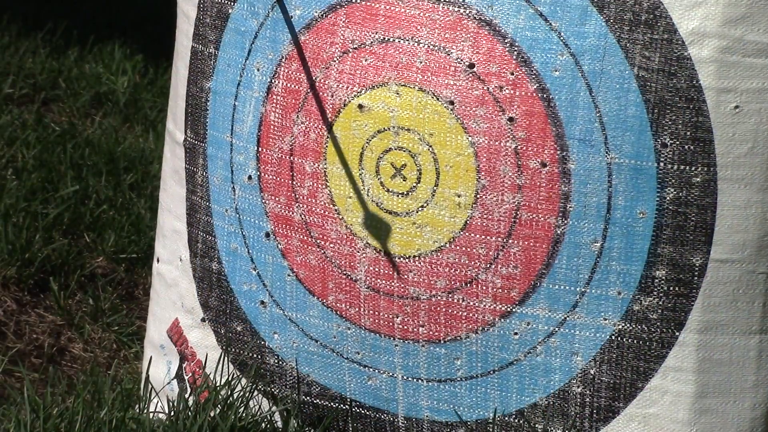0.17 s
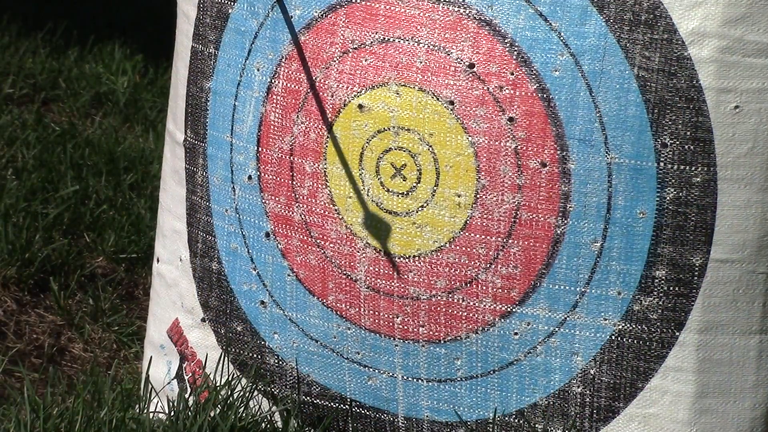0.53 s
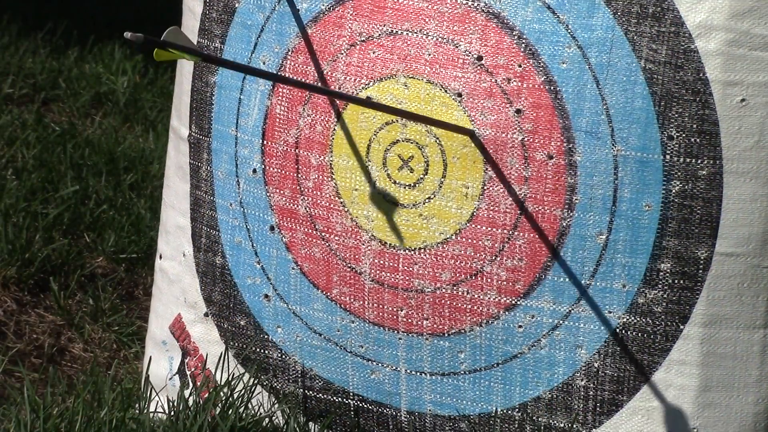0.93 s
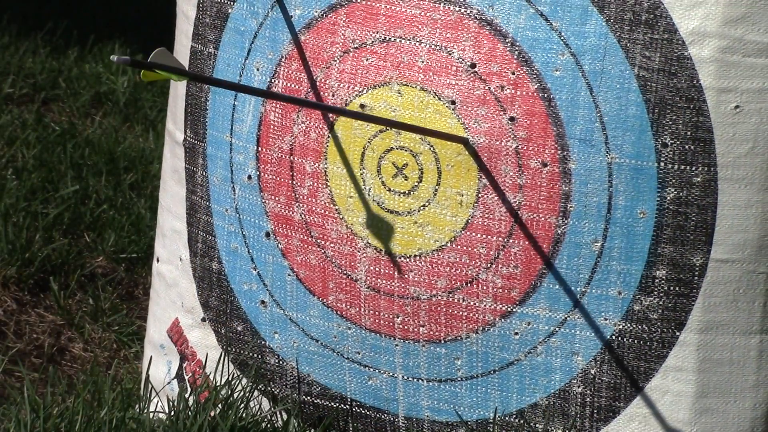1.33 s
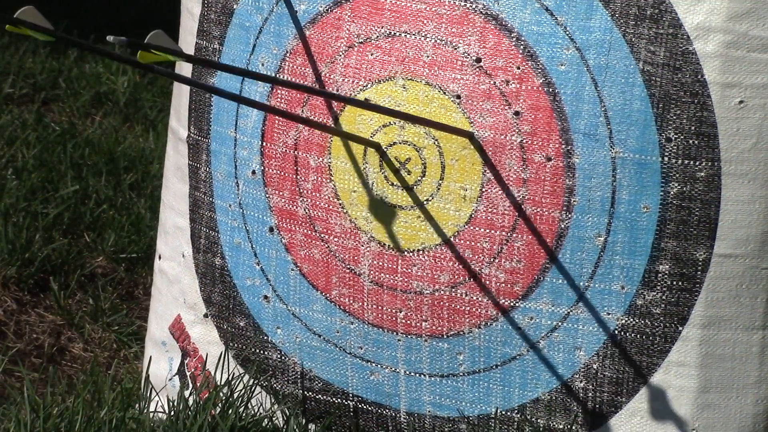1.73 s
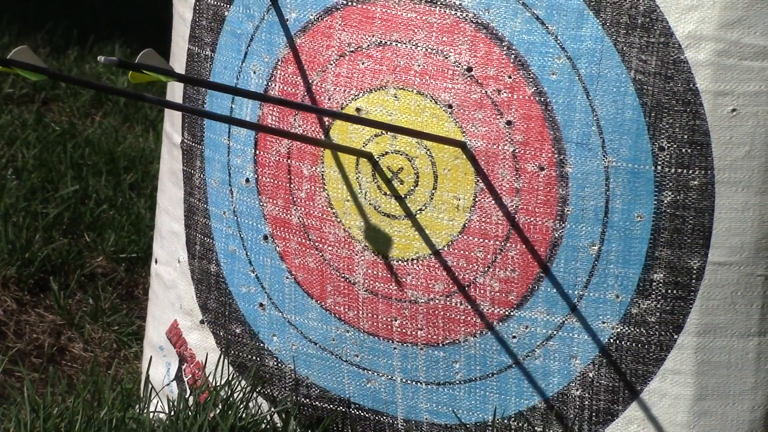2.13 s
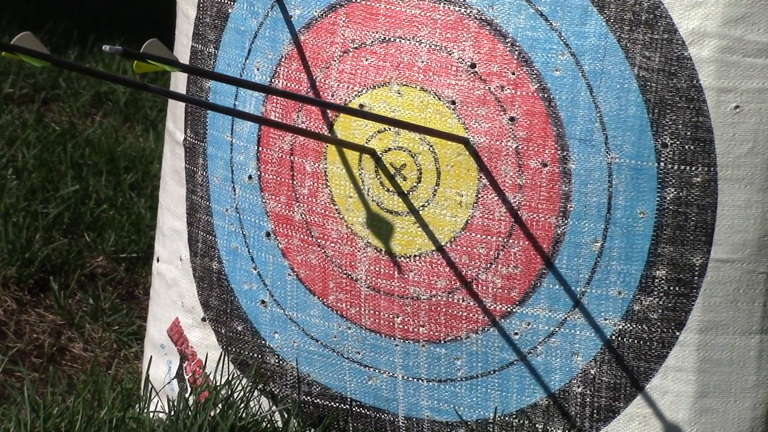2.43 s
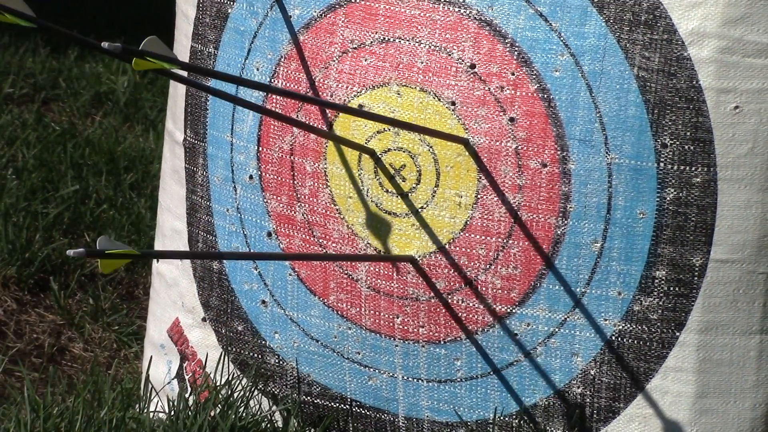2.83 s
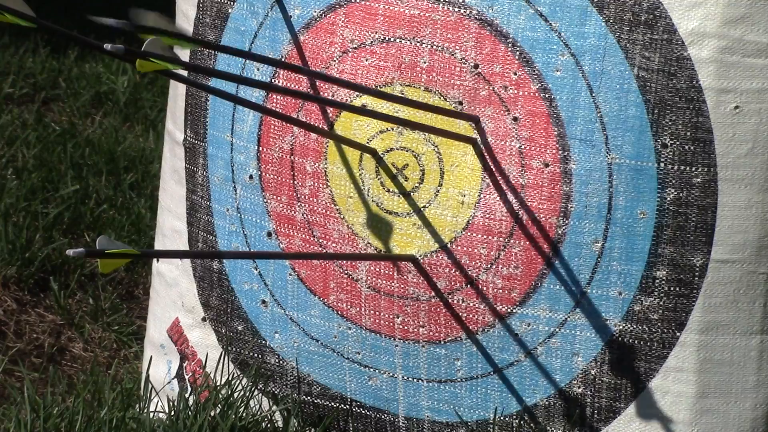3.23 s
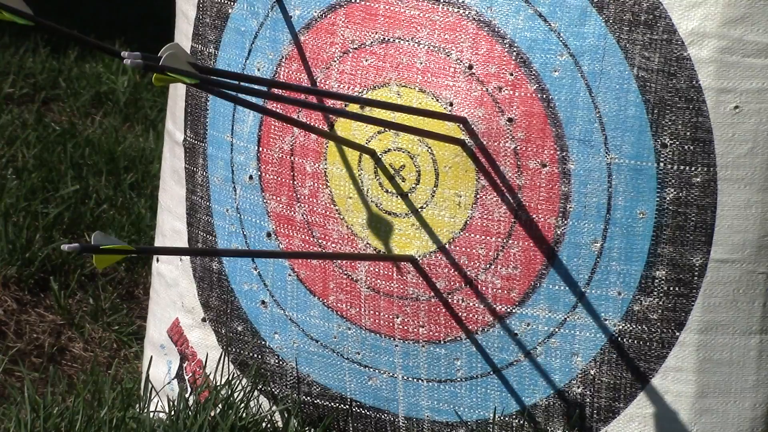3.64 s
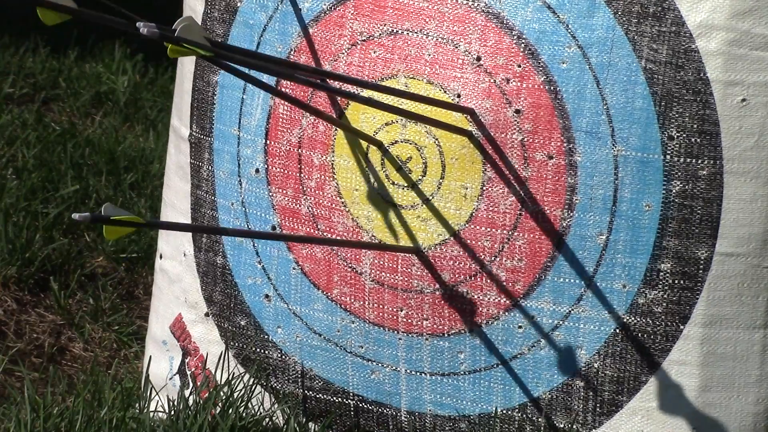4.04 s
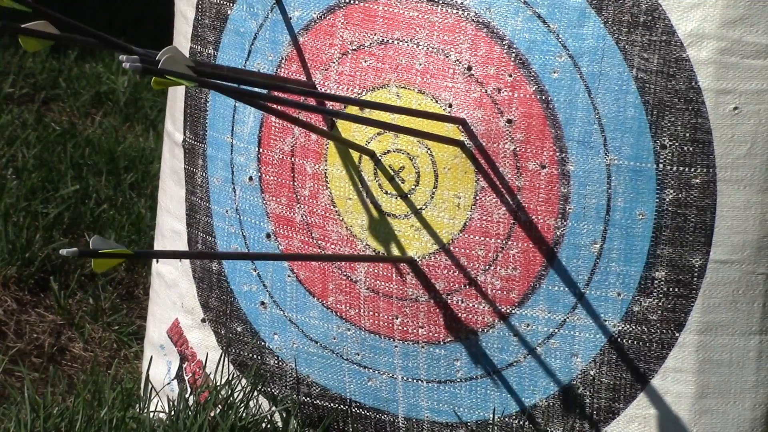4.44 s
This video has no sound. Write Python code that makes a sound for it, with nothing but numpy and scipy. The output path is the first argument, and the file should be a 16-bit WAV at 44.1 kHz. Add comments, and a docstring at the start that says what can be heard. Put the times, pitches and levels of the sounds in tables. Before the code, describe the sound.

Five similar archery shots, recorded close to the target: faint bow snap slightly left, about a fifth of a second of vane hiss rushing nearer, then a sharp overloaded smack of taut fabric with a falling thud and hollow bag boom. Lodged shafts wobble with small dull knocks and dry rasps; brief tree reflections fade or stop short. Between hits, low outdoor air, a thin insect trill and a far whine that dies away.

```python
"""Five arrows strike a fabric bag target on a lawn, heard from beside it: each hit is a ringing pop and tear
of taut fabric over a falling thud and a boom, loud enough to overload the microphone. The shaft then knocks
and rasps in the bag while noise tails give the scatter of the trees. Before each hit a compound bow snaps
twice, built from noise bursts and ringing modes, and the vanes hiss and whistle as the arrow nears.
Behind lie outdoor air, a faint insect trill in filtered noise and a wavering far whine."""
import sys
import numpy as np
from scipy import signal
from scipy.fft import rfft, irfft
from scipy.io import wavfile

SR = 44100
rng = np.random.default_rng(int(sys.argv[2]) if len(sys.argv) > 2 else 0)


def master_out(mix):
    """Clip the mix to full scale and print it as 16-bit PCM to the path in sys.argv[1]."""
    frames = np.transpose(np.atleast_2d(mix))
    ceiling = np.clip(frames, -1, 1)
    pcm = np.round(ceiling * 32767).astype(np.int16)
    wavfile.write(sys.argv[1], SR, pcm)


N = 202128
TIME = np.arange(N) / SR

# All spectra list pitch_hz, density_db (relative); noise() brings each to rms 1.
# All sets of modes list pitch_hz, level_db (relative), t60_s.

# Arrows striking the bag: start_s, thud_db, thud_hz (where it settles), dent_hz (extra pitch at first), boom_db
HITS = [(0.885, -4.5, 195, 560, -13.5), (1.7052, -1.5, 162, 435, -5), (2.571, -1.5, 189, 372, -5),
        (3.2753, -4.5, 149, 465, -5), (3.869, 0.5, 182, 342, -12.5)]
# Fabric bursting, hit by hit: pop_hz, treble_db (tilt per decade), tear_db, top_hz (of the tear), hollow (0-1)
CRACKS = [(1942, 8.5, -8, 6300, 0.71), (2290, -15, -8, 10300, .8), (2150, -11.5, -4, 7100, 0),
          (1710, -5, -2, 5140, 0.5), (1820, 4.5, -3.5, 12000, 1)]
# Modes: overtones of the taut fabric
FABRIC = [(5190, -8, 0.0028), (7320, -5.5, 0.0018), (10230, -16, 0.00061), (12400, -15.5, 0.0015),
          (14340, -26, .0016)]
# Band where taut fabric radiates weakly, between pop and overtones: low_hz, high_hz
HOLLOW_HZ = [3010, 4500]
# Modes: the bag as a whole and its stretched face
BAG = [(155, 4, 0.036), (515, -6.5, 0.039), (615, -3, 0.022)]
# Lodged shafts whipping back: delay_s (after the hit), thump_hz, thump_db, rasp_db, return_db (second thump)
WHIPS = [(0.0316, 377, -12, -25.5, -31), (0.028, 276, -11, -34, -12.5), (0.028, 250, -22, -40, -15.5),
         (0.018, 230, -14.5, -54.5, -21), (0.032, 374, -19, -42, -18)]
# Spectrum: the shaken filling
FILLING = [(30, -28), (60, -1), (110, -1.5), (300, -4), (560, -7), (850, -24.5), (1500, -32), (4000, -29)]
# Spectrum: the shaft rasping in its hole
RATTLE = [(300, -23), (700, 1), (1800, 10), (3200, -3), (5000, 3), (7000, -2), (9000, -5), (12500, -21.5),
          (16000, -71)]
# Bow loosed: start_s, click_db
RELEASES = [(0.675, -53), (1.495, -44), (2.349, -20.5), (3.064, -39), (3.658, -43)]
# Modes: limbs, cams and cables of the bow
BOW = [(287, -5.5, 0.1), (437.8, -10, 0.33), (547, -8, 0.22), (884, -18.5, 0.13), (1095, -6, 0.059),
       (1486, -2.5, 0.083), (1950, -7.5, 0.092), (2160, -12, 0.067), (2800, -12, 0.059), (3310, 3, 0.023)]
# Spectrum: clatter of the bow
SNAP = [(60, -16), (150, 2.5), (450, 2.5), (900, -5.5), (1700, -2), (3300, -4), (4000, -7), (5200, -11.5),
        (7000, -20), (11000, -25.5), (16000, -51)]
# Arrows in flight: hiss_db, rush_db (steady part), whistle_db, whistle_s (how long before the hit it sets in)
FLIGHTS = [(-35.5, -56, -59, 0.12), (-37, -56, -62, 0.22), (-40.5, -49.5, -49.5, 0.202),
           (-36.5, -56.5, -53.5, 0.1), (-39.5, -54, -68, 0.078)]
# Whistle of the vanes: pitch_hz, level_db (relative), swell (power of the nearness)
VANES = [(349, 10.5, 0.93), (670, 2.5, 0.77), (1160, 3.5, 0.19)]
# Spectrum: hiss of the vanes
HISS = [(100, -2.5), (250, -15), (600, -14.5), (1100, 0.5), (1700, 0.5), (2500, 4), (4300, 2), (6000, -5.5),
        (10500, -13), (13000, -20), (16000, -24)]
# Scatter after each hit: level_db (added to both tree layers), rumble_db (on the low part), sheen_db, length_s
TAILS = [(0.5, -6.5, -47, 0.37), (-2, 2, -48, 0.51), (-2, 0.5, -45, 0.217), (3, -6.5, -60, .32),
         (1.5, 2.5, -34, .68)]
# Spectra: low, high and glittering parts of the scatter
TREES_LOW = [(70, -10.5), (250, 7.5), (500, -7), (900, -2.5), (1800, -1), (2500, -6.5), (3400, -13.5),
             (5000, -61)]
TREES_HIGH = [(2500, -42.5), (3600, -1), (5000, 5.5), (6800, -4), (8500, -12), (12000, -25.5), (16000, -41)]
SHEEN = [(4500, -17), (5600, 9), (7000, 5), (8500, -12), (12000, -10), (14500, -23)]
# Spectrum: outdoor air
AIR = [(15, -58), (25, -56), (45, -15.5), (170, -2), (195, -4.5), (229, -3.5), (439, -9), (503, -10.5),
       (560, -13), (1070, -18.5), (1160, -19.5), (2910, -23), (6920, -31.5), (8360, -36), (16000, -42.5)]
# Spectrum: insects
INSECTS = [(6800, -39.5), (7600, -15.5), (8000, -12.5), (8400, -6.5), (8650, -11), (9000, -44.5),
           (10000, -52)]
# Stereo width of the noise layers: pitch_hz, side_db (against the mid)
WIDTH = [(100, -16.5), (700, -7.5), (2400, -24), (4400, -18.5), (8000, -11.5), (15000, -19)]

POP_DB, POP_T60_S, TEAR_T60_S, CRACK_CUT_HZ = 10, 0.0025, 0.0072, 1257
THUD_T60_S, THUD_DOUBLES_DB = 0.053, 7.5   # ring of a 0 dB thud; it doubles for this many dB more
FILLING_DB, RATTLE_DB = -23, -43
FILLING_FOLLOWS = 0.4   # share of the boom's level that the deep shake of the filling follows
RETURN_S, RETURN_PITCH = 0.053, 0.83   # the slower return swing thumps lower
SLIP_START_S, SLIP_EVERY_S, SLIP_DB, SLIP_LOSS_DB = 0.044, 0.0066, -32.5, 3.5   # loss is per slip
SNAP_DB, REBOUND_DB, REBOUND_S = -31, -31, 0.0255
TREES_LOW_DB, TREES_HIGH_DB, RUMBLE_EDGE_HZ, SHEEN_T60_S = -36, -36.5, 450, 0.64
EDGE_ECHO_S, WALL_ECHO_S = 0.0226, 0.174
AIR_DB, INSECTS_DB = -52.5, -63.5
WHINE_HZ, WHINE_DB, WHINE_T60_S = 496, -49.5, 2
PORT_LAG_S, MIC_CUT_HZ, CUTOFF_HZ = 3e-6, 53, 16000


def impacts(dent_s=0.0032):
    """Under each crack a thud falls in pitch as the dent spreads, and the whole bag booms."""
    body = 0
    for s, thud_db, thud_hz, dent_hz, boom_db in HITS:
        age = np.maximum(TIME - s, 0)
        cycles = thud_hz * age + dent_hz * dent_s * (1 - np.exp(-age / dent_s))
        thud_t60 = THUD_T60_S * 2 ** (thud_db / THUD_DOUBLES_DB)
        body = body + from_db(thud_db) * np.cos(2 * np.pi * cycles) * decay(s, thud_t60)
        for hz, db, t60 in BAG:
            boom = np.cos(2 * np.pi * hz * age) * decay(s, t60, rise=0.0018)
            body = body + from_db(boom_db + db) * boom
    # the small puncture radiates no bass, the soft filling no treble
    crack = band(band(cracks(), CRACK_CUT_HZ, "high"), CRACK_CUT_HZ, "high")
    return crack + band(body, [85, 750], "band")


def cracks():
    """The point pops the taut fabric, rings its overtones and tears its weave."""
    out, white = 0, rng.standard_normal(N)
    for (s, *_), (pop_hz, treble_db, tear_db, top_hz, hollow) in zip(HITS, CRACKS):
        pop = ring(s, pop_hz, POP_T60_S)
        for hz, db, t60 in FABRIC:
            tilt_db = treble_db * np.log10(hz / pop_hz)
            pop = pop + from_db(db + tilt_db) * ring(s, hz, t60)
        weave = rms_one(band(white, [1300, top_hz], "band"))
        tear = weave * (decay(s, TEAR_T60_S) + 0.047 * decay(s, t60=0.039))
        crack = from_db(POP_DB) * pop + from_db(tear_db) * tear
        out = out + crack - np.clip(hollow, 0, 1) * band(crack, HOLLOW_HZ, "band")
    return out


def quiver():
    """The lodged shaft whips out and back: it knocks twice, shakes the filling and rasps in its hole."""
    out, filling = 0, noise(FILLING).mean(axis=0)
    deep = band(filling, 170, "low")
    dull = -band(filling, 160, "high")   # inverted to join the deep band smoothly
    rasp = rms_one(compact(noise(RATTLE)) * from_db(1.5 * flutter(660)))
    slap = band(rasp, 12000, "low")
    for (s, *_, boom_db), (whip_s, hz, thump_db, rasp_db, return_db) in zip(HITS, WHIPS):
        swing = np.exp(-((TIME - s - 0.05) / 0.021) ** 2)   # the shaft swings back
        shaken = dull + from_db(3.5 + FILLING_FOLLOWS * boom_db) * deep
        shake = shaken * (decay(s, t60=0.28, rise=0.0013) + 0.17 * swing)
        rattle = rasp * (swing + 0.22 * decay(s, t60=0.13, rise=0.0039))
        out = out + from_db(FILLING_DB) * shake + from_db(RATTLE_DB) * rattle
        out = out + from_db(thump_db) * thump(s + whip_s, hz)
        out = out + from_db(return_db) * thump(s + RETURN_S, hz * RETURN_PITCH)
        scrape = from_db(rasp_db) * decay(s + whip_s, t60=0.019)
        out = out + slap * (scrape + slips(s + SLIP_START_S))
    return band(out, 85, "high")


def thump(start, hz):
    """A soft knock of the shaft against the filling; height 1."""
    wave = np.sin(2 * np.pi * hz * (TIME - start)) * decay(start, t60=0.011, rise=0.0073)
    return wave / np.abs(wave).max()


def slips(start, count=3):
    """Level of a short, uneven, dying run of slips of the shaft in its hole."""
    level, jitter = 0, rng.uniform(-0.118, 0.126, count)   # jitter in shares of the interval
    for k in range(count):
        moment = start + SLIP_EVERY_S * (k + jitter[k])
        level = level + from_db(SLIP_DB - SLIP_LOSS_DB * k) * decay(moment, t60=0.028)
    return level


def bow():
    """The string slams home and rings the bow; a thinner, higher snap follows on the rebound."""
    out, clatter = 0, compact(noise(SNAP), treble_db=8)
    thin = rms_one(band(clatter, [2000, 4000], "band"))
    click = rms_one(band(clatter, 770, "high") + 1.3 * band(clatter, 6000, "high"))
    for s, click_db in RELEASES:
        again, modes = s + REBOUND_S, 0
        for hz, db, t60 in BOW:
            struck = ring(s, hz, t60) + 0.17 * ring(again, hz, t60)
            modes = modes + from_db(db) * rng.choice([-1, 1]) * struck
        slam = clatter * (0.53 * decay(s, t60=0.011) + 0.68 * decay(s, t60=0.18, rise=0.0015))
        slam = slam + 0.79 * band(modes, 260, "high")
        rebound = 1.2 * thin * decay(again, t60=0.017)
        rebound = rebound + 0.56 * clatter * decay(again, t60=0.078, rise=0.0012)
        clicks = click * (decay(s, t60=0.0072) + decay(again, t60=0.015))
        out = out + from_db(SNAP_DB) * slam + from_db(REBOUND_DB) * rebound + from_db(click_db) * clicks
    return out


def flight(miss_s=0.026, nearest_s=0.0267, mach=0.19, bend_s=0.0352):
    """Vanes hiss and whistle louder as the arrow nears; their whistle sinks as it comes abreast."""
    out, hiss = 0, noise(HISS) * from_db(2 * flutter(250))
    bright = band(hiss, 7400, "high")
    for (loosed, _), (s, *_), (hiss_db, rush_db, whistle_db, whistle_s) in zip(RELEASES, HITS, FLIGHTS):
        airborne = np.clip((TIME - loosed) / 0.019, 0, 1) * np.clip((s - TIME) / 0.0015, 0, 1)
        ahead = s - nearest_s - TIME   # seconds still to fly to the nearest point
        nearness = miss_s / np.hypot(ahead, miss_s)
        abreast = np.exp(-np.abs(s - 0.012 - TIME) / 0.014)   # the top is heard best from the side
        rush = hiss * (from_db(hiss_db) * nearness ** 2.65 + from_db(rush_db))
        rush = rush + from_db(hiss_db + 8.5) * abreast * bright
        doppler = (1 - mach) / (1 - mach * ahead / np.hypot(ahead, bend_s))
        eddies = 1 + 0.0062 * flutter(120)   # they unsteady the pitch
        turns = 2 * np.pi * np.cumsum(doppler * eddies) / SR
        # the whistle is thrown forward, the more so the higher its pitch
        beam = np.clip((s - TIME) / 0.047, 0, 1)
        whistle = 0
        for hz, db, swell in VANES:
            tone = np.sin(hz * turns + rng.uniform(0, 2 * np.pi))
            whistle = whistle + from_db(db) * nearness ** swell * beam ** (hz / 600) * tone
        sets_in = np.clip((TIME - s + whistle_s) / 0.0083, 0, 1)
        out = out + airborne * rush + sets_in * from_db(whistle_db + 1.8 * flutter(60)) * whistle
    return out


def garden(hit):
    """Lawn and trees scatter each crack as noise tails; a near edge ticks and a far wall echoes dully."""
    low, high, sheen, out = noise(TREES_LOW), noise(TREES_HIGH), noise(SHEEN), 0
    rumble = band(low, RUMBLE_EDGE_HZ, "low")
    middle = -band(low, RUMBLE_EDGE_HZ, "high")   # inverted to join the rumble smoothly
    for (s, *_), (db, rumble_db, sheen_db, length_s) in zip(HITS, TAILS):
        body = (middle + from_db(rumble_db) * rumble) * decay(s, t60=0.96, rise=0.11)
        treble = high * decay(s, t60=0.66, rise=0.13)
        glitter = from_db(sheen_db) * sheen * decay(s, SHEEN_T60_S, rise=0.082)
        tail = from_db(TREES_LOW_DB + db) * body + from_db(TREES_HIGH_DB + db) * treble + glitter
        out = out + tail * np.clip((s + length_s - TIME) / 0.013, 0, 1)   # the tail stops short
    tick = from_db(-19.5) * delayed(band(hit, [3800, 6200], "band"), EDGE_ECHO_S)
    wall = from_db(-28) * delayed(band(hit, [700, 1200], "band"), WALL_ECHO_S)
    return out + tick + wall


def background():
    """Air and insect trill, both noise of gently wavering level, and a far whine that swells and fades."""
    air = band(from_db(AIR_DB) * noise(AIR), 14000, "low") * from_db(1.37 * flutter(8))
    insects = from_db(INSECTS_DB) * noise(INSECTS) * from_db(flutter(40))
    turns = 2 * np.pi * np.cumsum(WHINE_HZ * (1 + 0.003 * flutter(8))) / SR
    whine_level = from_db(WHINE_DB + 2 * flutter(15)) * decay(0, WHINE_T60_S, rise=0.085)
    return air + insects + whine_level * np.sin(turns)


def from_db(db):
    """Decibels to amplitude."""
    return 10 ** (np.asarray(db) / 20)


def rms_one(x):
    """Scale to rms 1."""
    return x / np.sqrt(np.mean(x ** 2) + 1e-20)


def band(x, edges_hz, kind):
    """Gentle second-order Butterworth filter."""
    sos = signal.butter(2, np.clip(edges_hz, 10, 0.45 * SR), kind, fs=SR, output="sos")
    return signal.sosfilt(sos, x + 1e-18)


def noise(spectrum):
    """Steady stereo noise of a given colour; rms 1."""
    hz, db = np.transpose(spectrum)
    bins = np.maximum(np.fft.rfftfreq(N, 1 / SR), 1)
    gain = from_db(np.interp(np.log(bins), np.log(hz), db))
    gain = gain * np.minimum(bins / hz[0], 1) * np.minimum(hz[-1] / bins, 1)   # slopes beyond the ends
    mid, side = rfft(rng.standard_normal((2, N))) * gain
    side = side * from_db(np.interp(bins, *np.transpose(WIDTH)))
    return rms_one(irfft(np.array([mid + side, mid - side]), N))


def compact(x, treble_db=0.0, edge_hz=3600):
    """Narrow noise to mono below the edge, leaving stereo width only in the treble."""
    mid, side = x.mean(axis=0), (x[0] - x[1]) / 2
    return mid + from_db(treble_db) * band(side, edge_hz, "high") * np.array([[1], [-1]])


def flutter(hz):
    """Random wavering slower than about the given rate; rms 1."""
    return rms_one(band(rng.standard_normal(N), hz, "low"))


def decay(start, t60, rise=1e-5):
    """Envelope: silent until the start, then rises and dies away."""
    age = np.maximum(TIME - start, 0)
    return (1 - np.exp(-age / rise)) * from_db(np.maximum(-60 * age / t60, -200))


def ring(start, hz, t60):
    """A struck mode: a sine whose envelope starts at height 1 and dies away."""
    age = TIME[:int(2 * t60 * SR) + 2]
    wave = np.sin(2 * np.pi * hz * age) * from_db(-60 * age / t60)
    at, out = int(start * SR), np.zeros(N)
    out[at:at + len(age)] = wave[:N - at]
    return out


def delayed(x, seconds):
    """The same sound arriving later."""
    return np.interp(TIME - seconds, TIME, x, left=0)


def scene():
    """The bag is nearly straight ahead; bow and flight lie a little to the left."""
    hit = impacts()
    at_ports = np.array([hit, delayed(hit, PORT_LAG_S)])
    approach = bow() + flight()
    leftward = from_db(-18.5) * band(approach, 1500, "high") * [[1], [-1]]
    return at_ports + quiver() + approach + leftward + garden(hit) + background()


def record(dry):
    """The microphone loses the deep bass, the cracks overload the input, and the top is cut."""
    clipped = np.clip(band(dry, MIC_CUT_HZ, "high"), -1, 1)
    steep_cut = signal.ellip(12, 0.1, 90, CUTOFF_HZ, fs=SR, output="sos")
    return signal.sosfilt(steep_cut, band(clipped, 35, "high"))


dry = scene()
out = record(dry)
master_out(out)
```